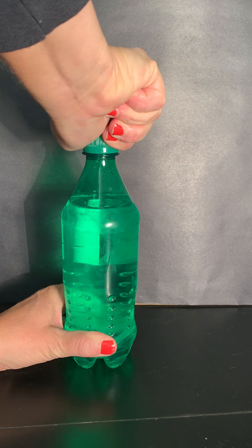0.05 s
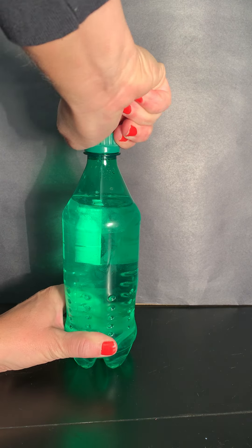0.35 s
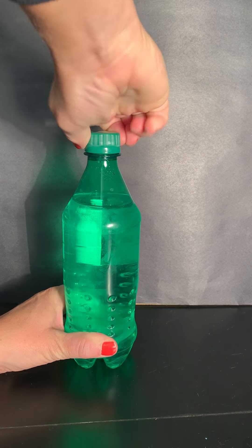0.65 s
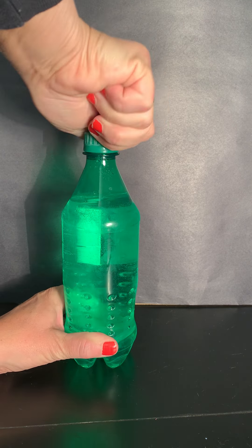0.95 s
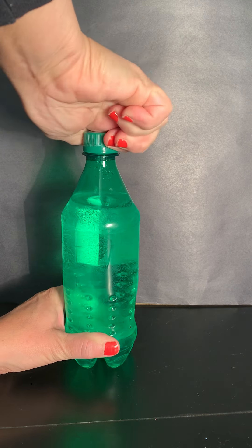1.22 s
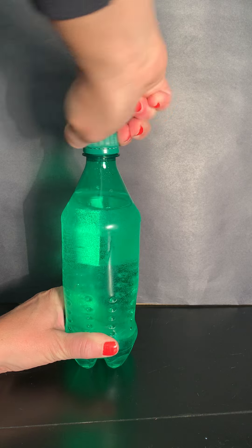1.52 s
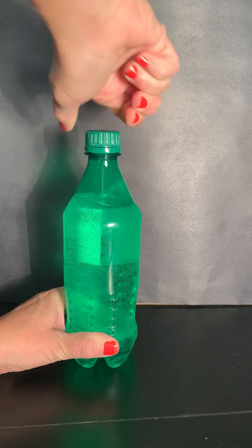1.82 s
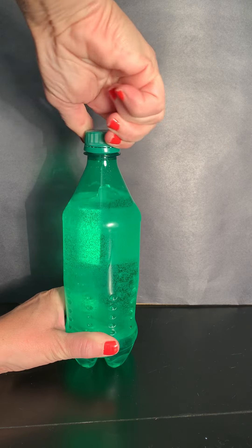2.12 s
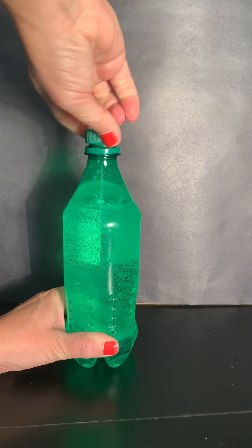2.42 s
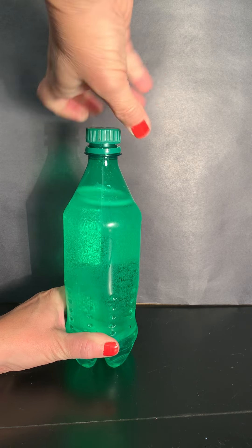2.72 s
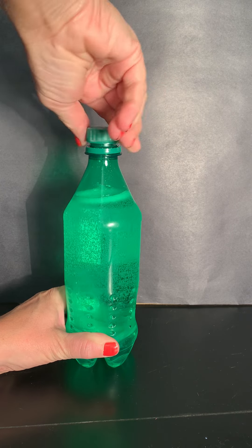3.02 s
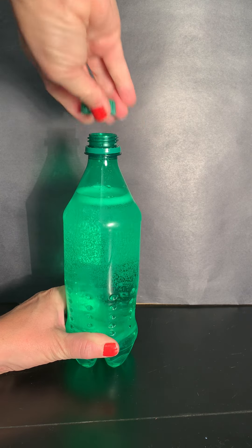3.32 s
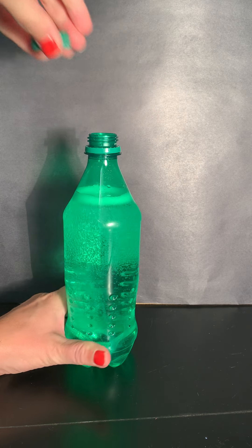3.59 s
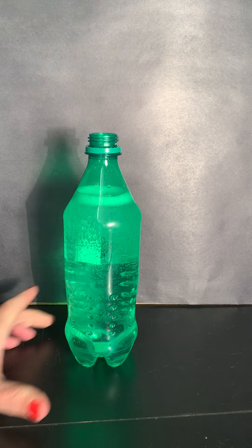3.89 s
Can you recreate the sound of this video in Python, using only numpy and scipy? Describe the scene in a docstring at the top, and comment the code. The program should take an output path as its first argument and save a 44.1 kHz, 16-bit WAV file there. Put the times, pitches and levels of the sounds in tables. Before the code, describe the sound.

A plastic soda bottle is opened with a short, strong hiss of gas. The cap rubs, snaps and clicks as it unscrews, bumping the bottle on the table, then faint fizz rises. Close up, over a small room's low hum.

```python
"""A plastic soda bottle on a table in a small room, close to a stereo pair of microphones.
Over a mains hum, the seal gives with a brief note and gas rushes out under the cap for half a second.
The cap rubs round its thread, its safety ring snaps, and it knocks over the last turns, jolting the
bottle against the table. As the cap is lifted off, bursting bubbles swell into a fizz."""
import sys
import numpy as np
from scipy import signal
from scipy.fft import rfft, irfft
from scipy.io import wavfile

SR = 44100
rng = np.random.default_rng(int(sys.argv[2]) if len(sys.argv) > 2 else 0)


def digitize_waveform(pressure):
    """Quantize a signal to 16-bit integers and store it at the path in sys.argv[1].

    Rows of a 2-D input are taken as channels; values are limited to [-1, 1].
    """
    field = np.atleast_2d(pressure).T
    bounded = np.clip(field, -1, 1)
    quanta = np.round(bounded * 32767).astype(np.int16)
    wavfile.write(sys.argv[1], SR, quanta)


N = 174195
T = np.arange(N) / SR


# hiss of the gas passing the seal, close up: (time [s], level [dB])
GAS_FLOW = [(.226, -99), (.23, -48.5), (.265, -48.5), (.3, -54), (.318, -47), (.335, -31.5), (.355, -21.5),
            (.385, -19), (.43, -18.5), (.45, -20.5), (.56, -21), (.62, -26.5), (.69, -33), (.725, -42.5),
            (.76, -60), (.8, -83), (.85, -100)]
# broad colour of the jet: (frequency [Hz], relative density [dB])
JET_SPECTRUM = [(500, -46), (1500, -33.5), (2100, -25), (3000, -17.5), (5400, -15), (7800, -3), (11000, 0),
                (14500, 2), (15650, 3.5), (16000, -31.5)]
# resonances of the gap under the cap: (frequency [Hz], width [Hz], boost [dB])
GAP_RESONANCES = [(3420, 680, 5), (3850, 480, 8.5), (4850, 400, 11.5), (6250, 600, 8.5), (7850, 280, 2),
                  (9480, 250, 5.5)]

def gas_escape():
    """The seal sings as it gives, then a turbulent jet tears droplets through the gap, dead centre."""
    droplets = rms_one(grains(per_s=1800, spread_db=1.5))
    turbulence = stereo_noise([(1000, 1)]) + from_db(-6.5) * droplets  # alike at both microphones
    jet = rms_one(colour(turbulence, JET_SPECTRUM, GAP_RESONANCES))
    low = signal.sosfiltfilt(butter(4, 3000), jet)
    top = signal.sosfiltfilt(butter(4, 11500, "high"), jet)
    flow, rush = level(GAS_FLOW), 0
    # a stronger jet is fuller and brighter; each band flutters on its own
    for band, extra_db_per_db in [(low, .05), (jet - low - top, 0), (top, .22)]:
        gain = flow * (flow / flow.max()) ** extra_db_per_db
        rush += band * gain * from_db(.75 * flutter(up_to_hz=170))
    t = T - GAS_FLOW[0][0]
    seal_note = rms_one(resonate(turbulence, hz=6150, width_hz=600))
    seep = from_db(-51.5) * seal_note * np.exp(-np.abs(t) / .01)
    return (rush + seep) * (t > 0)


# modes of cap and bottle: (frequency [Hz], relative level [dB], time to fall 60 dB [s])
PLASTIC_MODES = [(1112, -4.5, 0.03), (1880, -12.5, 0.051), (2193, -3.5, .036), (2278, -0.5, 0.016),
                 (3303, 0, 0.02), (3597, 3.5, .02), (3962, -2.5, 0.027), (4310, -10, 0.0056),
                 (6600, 7, .014), (6850, 10, 0.0047), (8050, 0, 0.018), (8940, -2.5, .014),
                 (11500, -6, 0.0013), (15300, 3, .005)]

def cap_response(force, crack_db, gap_hz):
    """A force makes the plastic ring and crack; gives body, middle and treble, each at unit rms."""
    ringing = 0
    for hz, db, t60 in PLASTIC_MODES:
        gap_db = 1.5 * np.exp(-((hz - gap_hz) / 260) ** 2)  # the air gap lifts modes near its pitch
        radius, angle = from_db(-60 / (t60 * SR)), 2 * np.pi * hz / SR
        real = radius * np.cos(angle)
        mode = signal.lfilter([1, -real], [1, -2 * real, radius ** 2], force + 1e-18)
        ringing += from_db(db + gap_db) * mode
    ringing = rms_one(ringing)
    crack = from_db(crack_db) * signal.sosfilt(butter(1, 1300, "high"), rms_one(force))
    low_hz, high_hz = 1620, 5240  # roughly where the bands part
    body = signal.sosfilt(butter(4, [250, low_hz], "band"), ringing + from_db(-8.5) * crack)  # hollow
    middle = signal.sosfilt(butter(4, [low_hz * 1.253, high_hz * .87], "band"), ringing + crack)
    treble = signal.sosfilt(butter(4, [high_hz * .94, 15500], "band"), ringing + crack)
    return np.array([rms_one(band) for band in (body, middle, treble)])


# snaps of the safety ring and knocks of the cap, at relative levels:
# (time [s], body [dB], middle [dB], treble [dB], contact decay [s])
CAP_CONTACTS = [(1.458, -77, -52, -49, 0.00058), (1.499, -77, -38, -27.5, 0.00068),
                (1.555, -56, -34, -23.5, 0.00094), (1.661, -60, -58, -62, .0012),
                (1.747, -73, -54, -63, 0.0009), (1.777, -57, -47.5, -50, 0.0005),
                (2.003, -61, -43.5, -61, 0.0005), (2.145, -71, -43, -19, .0009),
                (2.153, -44, -32, -23, .0009), (2.1652, -42, -19, -12, 0.00094),
                (2.1728, -45, -33, -17.5, 0.0011), (2.1822, -36.5, -29, -24.5, .0013),
                (2.2603, -27, -9, -15.5, 0.0014), (2.28, -45, -35, -41, 0.0017),
                (2.393, -58, -49.5, -58, 0.00082), (2.6939, -29.5, -22, -28.5, .0018),
                (2.7179, -59, -38, -58, 0.0015), (2.741, -50, -47.5, -59, 0.0022),
                (2.9837, -32.5, -36, -67, 0.00099), (2.815, -54, -57.5, -69, 0.0014),
                (3.126, -56, -42.5, -50, .001), (3.19, -47.5, -45, -72, 0.0016),
                (3.249, -49, -51.5, -65, 0.00089), (3.544, -59.5, -52, -35.5, 0.00095),
                (3.5598, -45.5, -71, -43, .0009)]
# note of the air gap under the rising cap: (time [s], pitch [Hz])
GAP_PITCH = [(1.5, 3400), (2.17, 3500), (2.26, 4130), (2.695, 3630), (2.985, 3210), (3.56, 3250)]

def snaps_and_knocks():
    """Brief rough contacts set the cap ringing; a longer one starts more gently and is duller."""
    out, t = np.zeros(N + SR), T[:SR // 5]
    gain = from_db(-3) * np.sqrt(.0033 / t[-1])  # energy counted over 3.3 ms
    for at, *band_db, decay in CAP_CONTACTS:
        fall = np.exp(-t / decay)
        force = rng.standard_normal(len(t)) * fall * (1 - fall)
        force = signal.sosfilt(butter(2, min(16 / decay, 19000)), force)
        crack_db = -4 - 7 * np.log2(decay / .001)  # shorter contacts crack more and ring less
        bands = cap_response(force, crack_db, gap_hz=np.interp(at, *np.transpose(GAP_PITCH)))
        start = int(at * SR)
        out[start:start + len(t)] += from_db(band_db) @ bands
    return gain * out[:N]


# cap and fingers rubbing: (peak time [s], swell [s], fade [s], body [dB], middle [dB], treble [dB])
TWISTS = [(0.954, .012, 0.01, -72, -64.5, -65.5), (1.055, .025, 0.019, -86, -73.5, -72.5),
          (1.459, .012, 0.022, -76.5, -66.5, -66), (1.498, 0.0018, 0.0022, -70, -53, -36),
          (1.535, .025, 0.058, -86, -62, -58.5), (1.667, .005, 0.033, -54, -56, -58),
          (1.781, .014, 0.01, -58.5, -53, -58.5), (1.912, .004, 0.0033, -75, -66.5, -66),
          (2.007, .009, 0.0072, -59, -55, -65), (2.042, .014, 0.019, -70, -65.5, -75),
          (2.141, .006, 0.016, -61.5, -48, -57.5), (2.21, .03, 0.052, -69.5, -66, -55.5),
          (2.2606, .007, 0.0044, -42.5, -27.5, -43), (2.299, .03, 0.031, -55, -51.5, -51.5),
          (2.421, .05, 0.081, -59.5, -55, -67), (2.69, .05, 0.035, -62, -64.5, -64),
          (2.696, 0.0023, 0.0028, -51, -33, -53), (2.754, .03, 0.076, -62, -66, -75.5),
          (2.985, 0.0058, 0.012, -53.5, -55, -70), (3.086, .012, 0.012, -57, -62, -80.5),
          (3.147, .03, 0.033, -51, -45.5, -56.5), (3.28, .025, 0.015, -62.5, -57.5, -58),
          (3.553, .02, 0.05, -66, -66.5, -62.5)]
# colour of the rubbing force: (frequency [Hz], relative density [dB])
FRICTION_SPECTRUM = [(300, 5.5), (420, 9.5), (600, -3.5), (850, -1.5), (1500, -2.5), (2300, 2.5),
                     (3500, -1), (5000, 0.5), (7700, 1.5), (10000, -5), (12500, -9), (15600, -12.5),
                     (16000, -31.5)]

def thread_rubbing():
    """Dense slips of plastic on plastic swell and fade with every twist."""
    strength = 0
    for peak, swell, fade, *band_db in TWISTS:
        envelope = np.exp(-np.abs((T - peak) / np.where(T < peak, swell, fade)) ** 1.1)
        strength += np.outer(from_db(band_db), envelope)
    slips = colour(grains(per_s=1800, spread_db=2), FRICTION_SPECTRUM)
    return (strength * cap_response(slips, crack_db=7.5, gap_hz=3240)).sum(axis=0)


# the bottle jolts against the table: (time [s], lower tone's pitch [Hz], its level [dB])
JOLTS = [(2.263, 298.4, -34.5), (2.696, 403, -39.5), (2.986, 410, -43.5), (3.56, 292, -38)]
# the tabletop under the bottle: (frequency [Hz], relative density [dB])
TABLETOP_SPECTRUM = [(120, -21), (230, 2.5), (450, 2.5), (600, -10.5), (850, -8.5), (1400, -11.5),
                     (2500, -36)]

def bottle_thuds():
    """The full bottle answers a jolt with two low, damped tones, and the table with a dull rattle."""
    rattle = from_db(-4.5) * rms_one(colour(rng.standard_normal(N), TABLETOP_SPECTRUM))
    out = 0
    for at, hz, db in JOLTS:
        t = np.maximum(T - at, 0)
        phase = 2 * np.pi * hz * t
        tones = np.sin(phase) + from_db(-12) * np.sin(1.2 * phase)
        out += from_db(db) * (t > 0) * (tones * die_away(t, t60=.11) + rattle * die_away(t, t60=.13))
    return out


# foam rising in the open bottle: (time [s], level [dB])
FOAM_LEVEL = [(2.3, -100), (3.1, -83.5), (3.5, -76), (3.7, -71.5), (3.82, -54.5), (3.95, -52)]
# colour of the bursting bubbles: (frequency [Hz], relative density [dB])
FOAM_SPECTRUM = [(1200, -14.5), (2700, -8.5), (4000, -10.5), (6000, -7), (7700, -2), (9000, -4.5),
                 (13000, 0), (15600, 4.5), (16000, -26)]
# ringing at the open neck: (time [s], level [dB])
NECK_LEVEL = [(2.9, -83.5), (3.25, -72.5), (3.5, -70), (3.75, -66.5), (3.95, -75)]

def fizz():
    """Countless small bubbles burst, and the air in the neck rings with them."""
    bursts = grains(per_s=9000, spread_db=2.5)
    foam = rms_one(colour(bursts, FOAM_SPECTRUM))
    neck = rms_one(resonate(bursts, hz=3240, width_hz=210))
    return level(FOAM_LEVEL) * foam + level(NECK_LEVEL) * neck


# off table and backdrop, near the bottle: (frequency [Hz], level against the direct sound [dB])
NEAR_REFLECTIONS = [(400, -5.5), (1500, -4), (3500, -8), (8000, -11.5), (15000, -13.5)]
# off the walls, farther away: (frequency [Hz], level against the direct sound [dB])
WALL_REVERB = [(300, -2), (1000, -7.5), (3000, -20), (8000, -28), (15000, -27)]

def room(direct):
    """The direct sound reaches the microphones first, then quick reflections and a faint tail."""
    t, echo = T[:SR // 2], 0
    for spectrum, t60 in [(NEAR_REFLECTIONS, .02), (WALL_REVERB, .42)]:
        reflections = rng.standard_normal((2, len(t))) * die_away(t, t60) * (t > .001)
        echo += colour(rms_one(reflections), spectrum)
    echo *= (1 - t / t[-1]) / np.sqrt(len(t))
    return direct + signal.fftconvolve(direct, echo, axes=1)[:, :N]


# hum in the room, midway between the microphones: (frequency [Hz], rms level [dB])
HUM_TONES = [(59.6, -50.5), (101.5, -54.5), (120.05, -36), (180, -63), (288, -66), (360, -70.5),
             (440, -67.5)]
# air of the room: (frequency [Hz], relative density [dB])
AIR_SPECTRUM = [(20, -23), (40, -11), (55, 6), (75, 4), (110, -4.5), (170, -5.5), (300, -13.5), (440, -16),
                (620, -24), (800, -20), (960, -31.5), (1130, -26.5), (1800, -44), (3200, -40.5),
                (5000, -44), (9000, -52.5), (15600, -58), (16000, -71.5)]
# how alike the air is at the two microphones: (frequency [Hz], likeness [0-1])
AIR_COHERENCE = [(150, 0.84), (350, 1), (700, 0), (3000, .25), (5000, 1), (15000, 1)]
# hum and air dip briefly, twice: (time [s], gain [dB])
ROOM_TONE_DIPS = [(.38, -0.5), (.46, -2), (.68, -2), (.8, -0.5), (2.255, 0), (2.28, -8), (2.355, -8),
                  (2.42, -0.5), (2.55, 0)]

def room_tone():
    """Mains hum, a little louder at the right microphone, over the low rush of the room."""
    hum = sum(from_db(db) * np.sin(2 * np.pi * (hz * T + rng.random())) for hz, db in HUM_TONES)
    stereo_hum = np.sqrt(2) * hum * from_db([[-1], [1.02]])
    air = from_db(-45) * rms_one(colour(stereo_noise(AIR_COHERENCE), AIR_SPECTRUM))
    return (stereo_hum + air) * level(ROOM_TONE_DIPS)


def from_db(db):
    """Decibels to gain."""
    return 10 ** (np.asarray(db) / 20)


def rms_one(x):
    """Scale to unit rms."""
    return x / np.sqrt(np.mean(x ** 2) + 1e-20)


def level(rows):
    """Gain over time from (time [s], level [dB]) rows."""
    return from_db(np.interp(T, *np.transpose(rows)))


def die_away(t, t60):
    """A fall of 60 dB every t60 seconds."""
    return from_db(-60 * t / t60)


def butter(order, hz, kind="low"):
    """Butterworth filter sections."""
    return signal.butter(order, hz, kind, fs=SR, output="sos")


def resonate(x, hz, width_hz):
    """Pass a signal through one resonance."""
    return signal.lfilter(*signal.iirpeak(hz, hz / width_hz, fs=SR), x)


def at_hz(rows, hz):
    """Read (frequency [Hz], value) rows on a log-frequency axis."""
    row_hz, values = np.transpose(rows)
    return np.interp(np.log(hz + 1), np.log(row_hz), values)


def colour(x, spectrum, peaks=()):
    """Give a signal a broad spectrum with resonant peaks on top."""
    hz = np.fft.rfftfreq(x.shape[-1], 1 / SR)
    peaks_db = sum(boost / (1 + (2 * (hz - centre) / width) ** 2) for centre, width, boost in peaks)
    return irfft(rfft(x) * from_db(at_hz(spectrum, hz) + peaks_db), x.shape[-1])


def stereo_noise(likeness):
    """White noise in two channels, as alike as the (frequency [Hz], likeness [0-1]) rows say."""
    alike = np.clip(at_hz(likeness, np.fft.rfftfreq(N, 1 / SR)), 0, 1)
    mid, side = rfft(rng.standard_normal((2, N)))
    return irfft(np.sqrt(1 + alike) * mid + np.sqrt(1 - alike) * side * [[1], [-1]], N)


def flutter(up_to_hz):
    """Random wavering with unit spread."""
    return rms_one(signal.sosfilt(butter(2, up_to_hz), rng.standard_normal(N)))


def grains(per_s, spread_db):
    """Random tiny clicks of uneven size."""
    size = from_db(spread_db * np.minimum(rng.exponential(1, N), 5))
    return size * rng.choice([-1, 1], N) * (rng.random(N) < per_s / SR)


def scene():
    """The bottle close up, with the room behind it."""
    bottle = gas_escape() + snaps_and_knocks() + bottle_thuds() + thread_rubbing() + fizz()
    return room(bottle) + room_tone()


def record(dry):
    """The recorder delays the right channel's treble above about 4100 Hz; the very top is cut."""
    hz = np.fft.rfftfreq(N, 1 / SR)
    lag_s = .00012 * .5 * (1 + np.tanh((hz - 4100) / (2 * 360)))
    right = irfft(rfft(dry[1]) * np.exp(-2j * np.pi * hz * lag_s), N)
    return signal.sosfilt(signal.cheby2(16, 60, 16600 + 500, fs=SR, output="sos"), [dry[0], right])


dry = scene()
out = record(dry)
digitize_waveform(out)
```